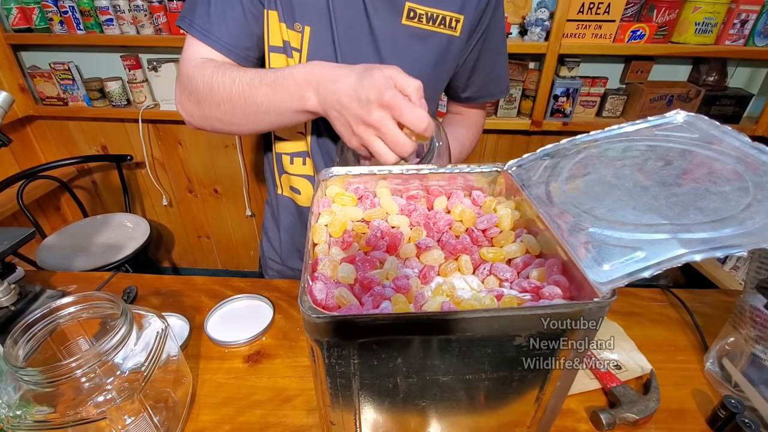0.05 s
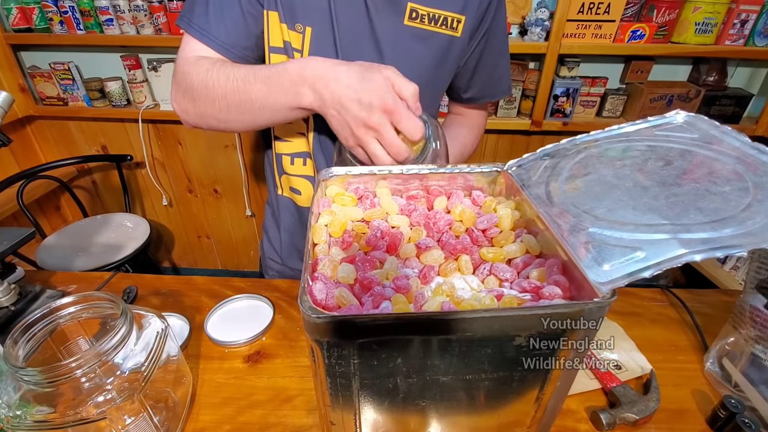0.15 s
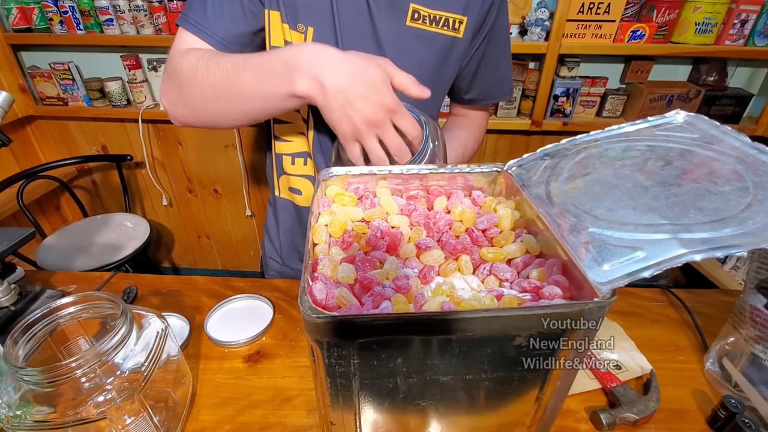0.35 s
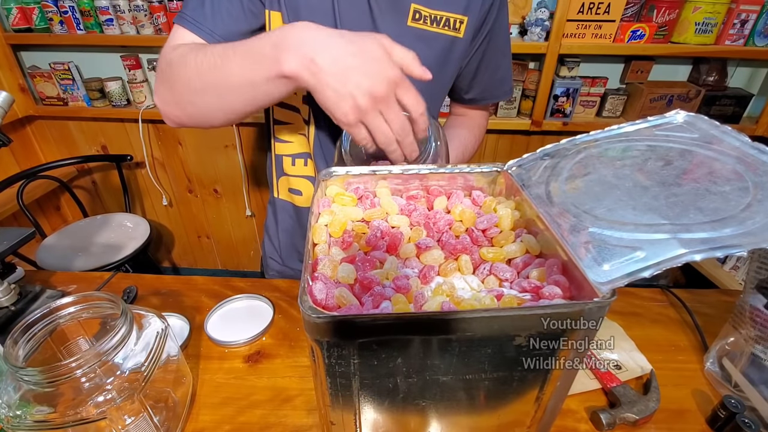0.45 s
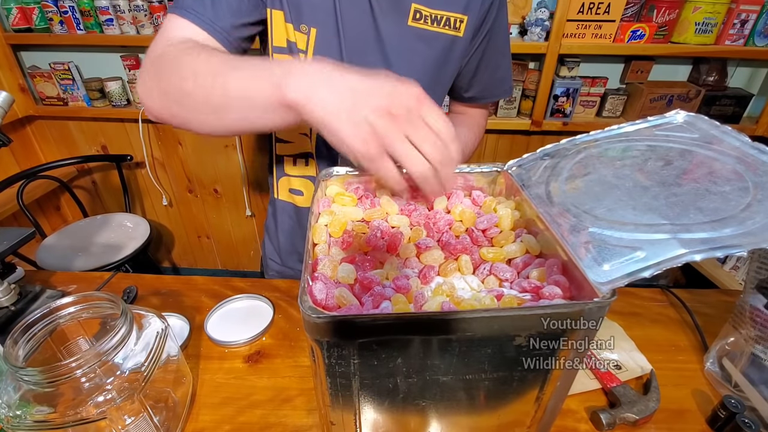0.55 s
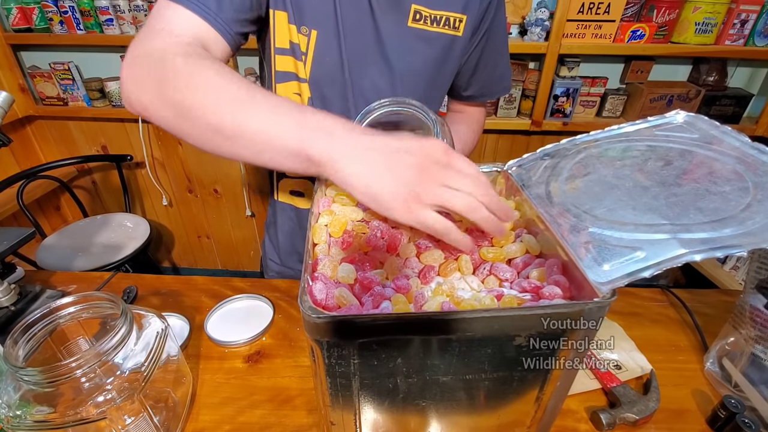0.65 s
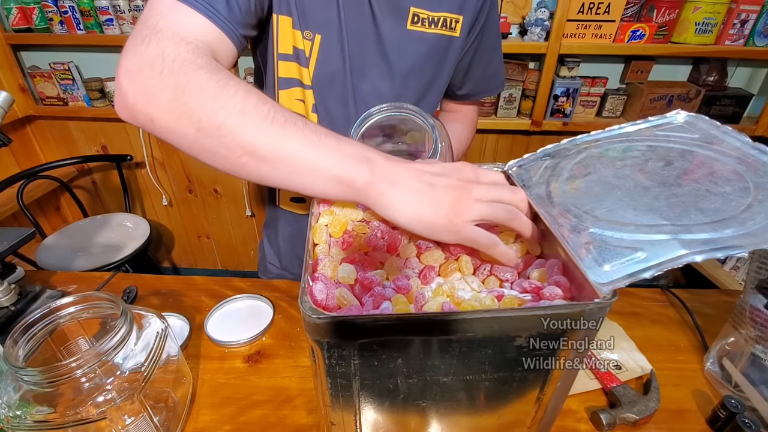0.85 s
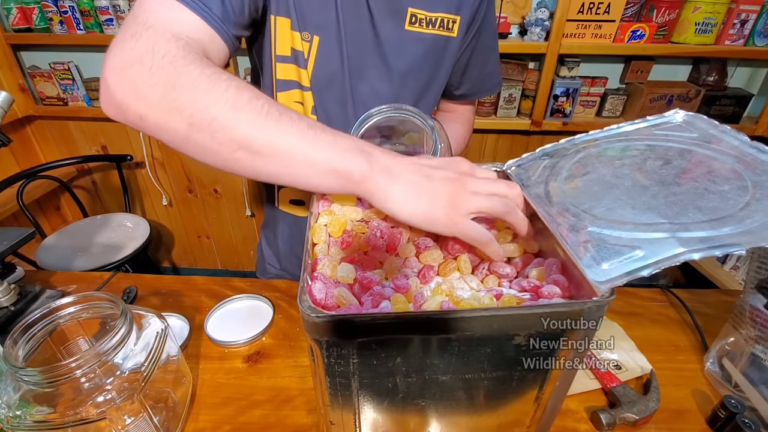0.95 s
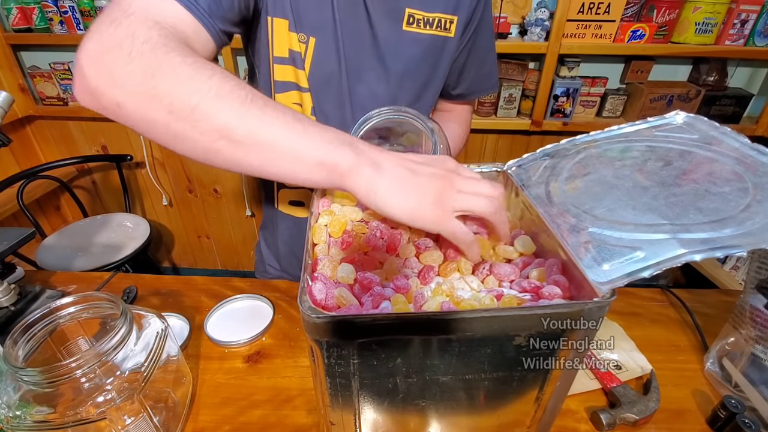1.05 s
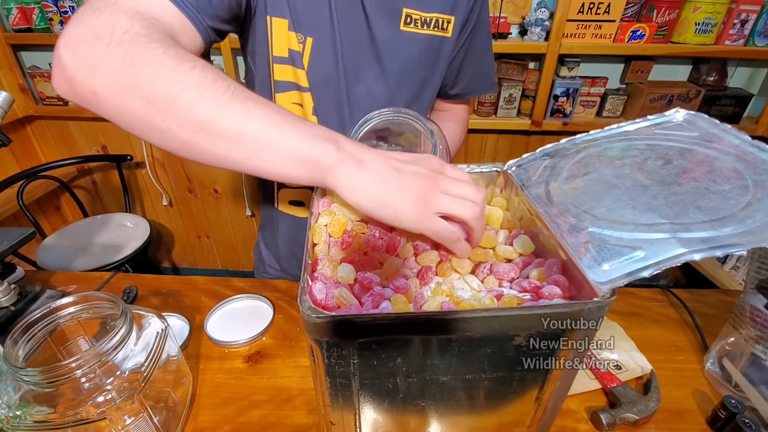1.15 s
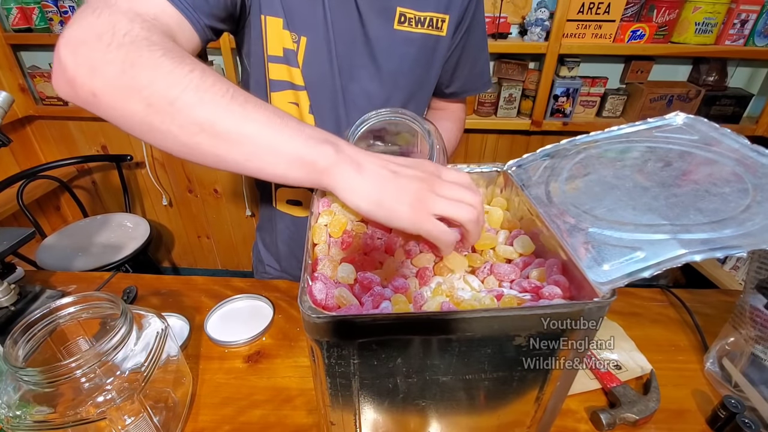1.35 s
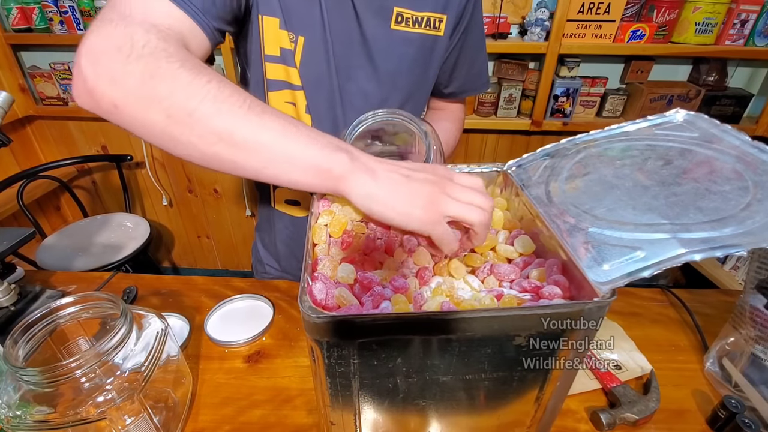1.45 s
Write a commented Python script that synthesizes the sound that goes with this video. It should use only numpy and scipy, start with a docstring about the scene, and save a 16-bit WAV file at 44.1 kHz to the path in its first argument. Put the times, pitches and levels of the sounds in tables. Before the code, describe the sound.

Hard candies tick lightly on a glass jar, then at 0.2 seconds tumble in with a quick clatter, the glass ringing over a soft hollow hum. A few stragglers clink until 0.7 seconds. At about 0.8 seconds a hand lands dully in a big metal tin and digs through sweets, which crunch and knock until 1.5 seconds. It is all close, in a small room.

```python
"""Over a faint low rumble, hard candy ticks lightly three times on a hand-held glass jar.
The candies tumble in with a quick clatter: the glass rings and the air inside hums. A few stragglers follow.
Then the hand lands in a big metal tin and digs through the sweets, which crunch and knock dully
against each other and the tin's walls. It is all heard close up, in stereo, in a small wood-lined room."""
import sys
import numpy as np
from scipy import signal
from scipy.fft import rfft, irfft, next_fast_len
from scipy.io import wavfile
from scipy.ndimage import map_coordinates

SR = 44100
rng = np.random.default_rng(int(sys.argv[2]) if len(sys.argv) > 2 else 0)


def bounce(signal):
    """Save signal as a 16-bit WAV file at the path given by the first command-line argument."""
    frames = np.transpose(np.atleast_2d(signal))
    limited = np.clip(frames, -1, 1)
    pcm = np.round(limited * 32767).astype(np.int16)
    wavfile.write(sys.argv[1], SR, pcm)


N = 66150  # 1.5 seconds
ATTACK_S = 0.00081  # how quickly a hit rises

# Stereo width of all but the clinks. Each row: frequency in Hz, how alike left and right are (1 = same).
LIKENESS = [(100, .98), (500, 1), (1000, 0.9), (2500, 0.57), (9000, 0.18)]


def amp(db):
    """Turn decibels into a gain."""
    return 10 ** (np.asarray(db) / 20)


def unit(x):
    """Scale a sound to an average (rms) level of 1."""
    return x / np.sqrt(np.mean(x ** 2) + 1e-20)


def along(points, hz):
    """Read between rows of frequency and value, on a pitch scale."""
    freqs, values = np.transpose(points)
    return np.interp(np.log(hz + 1), np.log(freqs + 1), values)


def filtered(x, response):
    """Multiply each frequency in x by the gain that response gives for it."""
    n = x.shape[-1]
    padded = next_fast_len(n + 8192)
    return irfft(rfft(x, padded) * response(np.fft.rfftfreq(padded, 1 / SR)), padded)[..., :n]


def stereo(pair, colour, likeness=LIKENESS, tilt_db=0):
    """Give two unrelated noises a tone colour and blend them into a partly alike left and right."""
    def response(hz):
        turn = np.arccos(np.clip(along(likeness, hz), -1, 1)) / 2
        octaves = np.log2(np.maximum(hz, 150) / 1000)
        return amp(along(colour, hz) + tilt_db * octaves) * [np.cos(turn), np.sin(turn)]
    mid, side = filtered(pair, response)
    return unit(np.array([mid + side, mid - side]))


def fade(t, t60):
    """Die away by 60 dB in t60 seconds, the fade time."""
    return amp(-60 * t / np.maximum(t60, 1e-3))


def rise(t, seconds=ATTACK_S):
    """Swell from silence towards full level."""
    return 1 - np.exp(-t / seconds)


def dying(x, fade_times):
    """Let each frequency of x die away at its own speed."""
    hz, t, spectrum = signal.stft(x, SR, nperseg=256)
    spectrum = spectrum * fade(t, along(fade_times, hz)[:, None])
    return signal.istft(spectrum, SR, nperseg=256)[1][:, :x.shape[1]]


def pan(db):
    """Two gains that make the left louder than the right by db."""
    return amp(np.array([[db], [-db]]) / 2)


def add(out, start, x):
    """Mix x into out, from start seconds on."""
    i = round(start * SR)
    out[:, i:i + x.shape[1]] += x[:, :N - i]


def noise(length):
    """Two unrelated white noises."""
    return rng.standard_normal((2, length))


def grains(per_second, spread_db=3):
    """Two streams of tiny random clicks."""
    hits = rng.random((2, N)) < per_second / SR
    return hits * np.sign(noise(N)) * amp(spread_db * noise(N))


def hush():
    """The faint, steady background noise of the room."""
    # Each row: frequency in Hz, level in dB.
    colour = [(20, -22), (35, -11.5), (52, 2), (90, -11.5), (300, -11.5), (700, -19), (1500, -17),
              (3500, -27.5), (6000, -24.5), (16000, -34)]
    return amp(-79) * stereo(noise(N), colour)


def room_echo(x, delay_s=0.008, level_db=-11.5):
    """The wooden walls send the sound back as a short tail."""
    # Each row: frequency in Hz, fade time in seconds.
    fade_times = [(150, 0.16), (2000, 0.28), (5000, 0.19), (14000, 0.24)]
    t = np.arange(SR // 2) / SR
    tail = dying(noise(len(t)), fade_times) * (t > delay_s)
    return amp(level_db) * signal.fftconvolve(x, tail / np.linalg.norm(tail[0]), axes=1)[:, :N]


def faint_rumble(fade_from_s=0.62):
    """A faint low rumble and soft rustle, dying away after the tumble."""
    # Each row: frequency in Hz, level in dB.
    colour = [(25, -11.5), (55, 19.5), (90, 4), (160, -7), (260, 5), (600, -4), (1100, -6.5), (2500, -7.5),
              (6000, -25.5), (16000, -27.5)]
    time_fading = np.maximum(np.arange(N) / SR - fade_from_s, 0)
    return amp(-64) * stereo(grains(per_second=5000), colour) * fade(time_fading, t60=0.48)


def jar_hollow(hum_hz=236.7):
    """The heap shifts with a soft thud, and the air in the jar hums a low note."""
    # The heap's shifts. Each row: start in seconds, level in dB.
    shifts = [(0.091, -59), (0.128, -49), (0.213, -37.5), (0.318, -34.5), (0.337, -37.5), (0.414, -36)]
    # Each row: frequency in Hz, level in dB.
    thud_colour = [(30, -24), (70, -12.5), (170, -20.5), (240, -3.5), (330, -18), (480, -1), (800, -15.5),
                   (1100, 1.5), (1500, -24), (5000, -55.5)]
    out, t = np.zeros((2, N)), np.arange(SR // 2) / SR
    for start, db in shifts:
        hum = np.sin(2 * np.pi * hum_hz * (t + start)) * rise(t, 0.006) * fade(t, t60=0.19)
        thud = stereo(noise(len(t)), thud_colour) * rise(t) * fade(t, t60=0.48)
        add(out, start, amp(db) * (hum + amp(-3.5) / 2 * thud))
    return out


def waver(count, length, radians=0.4, changes_per_s=120):
    """Candies touching the glass disturb its ring: each tone's phase drifts smoothly at random."""
    position = np.arange(length) * changes_per_s / SR
    drifts = rng.standard_normal((count, 128))
    return radians * np.array([map_coordinates(row, [position], mode='mirror') for row in drifts])


def glass_ring(t, tones, focus_hz, focus_octaves=0.2):
    """The glass rings at its own tones; the spot that is struck favours those near focus_hz."""
    hz, db, t60 = np.transpose(tones)[:, :, None]
    boost_db = 11.5 * np.exp(-(np.log2(hz / focus_hz) / focus_octaves) ** 2)
    scatter_db = 1.5 * rng.standard_normal(hz.shape)
    gains = amp(db + boost_db + scatter_db)
    phase = 2 * np.pi * rng.random(hz.shape)
    phase = phase + 0.59 * rng.standard_normal((2, len(hz), 1))  # left and right are a little apart
    waves = np.sin(2 * np.pi * hz * t + phase + waver(len(hz), len(t)))
    return (gains * fade(t, t60) * waves).sum(axis=1) * np.sqrt(2) / np.linalg.norm(gains)


def candy_ping(t, colour, centre_hz=6054, spread_octaves=0.65):
    """A struck candy rings briefly at high pitches of its own."""
    hz = centre_hz * 2 ** (spread_octaves * rng.standard_normal((14, 1)))
    gains = amp(along(colour, hz)) * (hz < 16000)
    phase = 2 * np.pi * rng.random((2, len(hz), 1))
    waves = gains * np.sin(2 * np.pi * hz * t + phase)
    return unit(waves.sum(axis=1)) * fade(t, t60=0.05)


def clinks(hits, colour, tones):
    """Each hit on the jar is a crack, a short clatter, the ring of the glass and the candy's ping."""
    # The clatter's stereo width. Each row: frequency in Hz, how alike left and right are (1 = same).
    likeness = [(250, 0.88), (1000, 0.67), (2500, 0.2), (5000, 0.1), (12000, 0.096)]
    # How the clatter dies. Each row: frequency in Hz, fade time in seconds.
    fade_times = [(300, 0.26), (2200, .115), (5000, 0.12), (12000, 0.11)]
    out, t = np.zeros((2, N)), np.arange(SR // 3) / SR
    for start, db, tilt_db, ring_db, pan_db, focus_hz in hits:
        clatter = dying(stereo(noise(len(t)), colour, likeness, tilt_db), fade_times)
        clatter *= 1 + amp(-8.5) * fade(t, t60=0.0038)  # the crack at the very start
        ring = amp(ring_db) * glass_ring(t, tones, focus_hz)
        ping = amp(-12 + tilt_db) * candy_ping(t, colour)  # brighter hits ping louder
        add(out, start, amp(db) * pan(pan_db) * (clatter + ring + ping) * rise(t))
    return out


def first_ticks():
    """Candy taps lightly on the glass before the tumble."""
    # Each row: start in seconds, level in dB, brightness in dB per octave, ring level in dB,
    # left over right in dB, favoured ring pitch in Hz.
    ticks = [(0.0425, -38.5, 0, 6, 2, 4180), (0.096, -51, 5, 4.5, 2, 4450),
             (0.1255, -34, 5.5, -4.5, 2.5, 7300)]
    # Each row: frequency in Hz, level in dB.
    colour = [(200, -17), (800, -11), (1100, -28), (1400, 2.5), (1950, 4), (2900, -5.5), (3900, 4.5),
              (4700, -13), (6400, -4.5), (7400, -40), (8900, -5), (10400, -35), (12200, -13.5),
              (16000, -31.5)]
    # The lightly tapped glass. Each row: pitch in Hz, level in dB, fade time in seconds.
    tones = [(1097, 1.5, 0.055), (3670, -0.5, 0.08), (3958, -6.5, 0.24), (4420, -10, 0.17),
             (4410, -5.5, .12), (4540, -6.5, 0.13), (4925, -7, 0.22), (5823, -4, 0.126), (9100, -30, 0.17)]
    return clinks(ticks, colour, tones)


def tumble():
    """The candies fall into the jar in a rush, with a few stragglers after them."""
    # Each row: start in seconds, level in dB, brightness in dB per octave, ring level in dB,
    # left over right in dB, favoured ring pitch in Hz.
    drops = [(0.2096, -37, 5, -4.5, 2.5, 4280), (0.2180, -34.5, -5, -8, 2, 2766),
             (0.2320, -34.5, -1, -9, -11.5, 2400), (0.2432, -30, 11.5, 4, 5, 3900),
             (0.2530, -29, -4, 2.5, 0.5, 3560), (0.2680, -34.5, 21.5, 7.5, 9, 2850),
             (0.2908, -28, 5, 4, 5, 3860), (0.3170, -26, 12.5, -3.5, 3, 9200),
             (0.3290, -29, -4.5, -13, 1.5, 2800), (0.3368, -31.5, -3, -1.5, 2.5, 5360),
             (0.3550, -20, 10, -3.5, 4, 5700), (0.3638, -27.5, 0, 2.5, -0.5, 3370),
             (0.3924, -13, 1, -6, 3.5, 1930), (0.4036, -25.5, 0, -9, 5.5, 2270),
             (0.4158, -29, 6, -0.5, -1, 3290), (0.4404, -17, 4.5, 4.5, 4.5, 3560),
             (0.4470, -20, 2, 2, 2, 2640), (0.4560, -29, -3, 4, 2.5, 2590),
             (0.5400, -40, -4, -22, 1.5, 2400), (0.5750, -44.5, -3, -15, 2.5, 2305),
             (0.6158, -38.5, 0, -4.5, 2, 2310), (0.6512, -29.5, 1, -5.5, 3.5, 2220),
             (0.7005, -40.5, 0.5, -39, 1.5, 2120)]
    # The clatter of candies and glass. Each row: frequency in Hz, level in dB.
    colour = [(120, -34), (250, -18), (800, -21.5), (1100, -18.5), (1300, -18.5), (1950, 2.5), (2650, 2.5),
              (3000, -7), (3400, 2), (4300, -6.5), (5600, -9), (6350, -5.5), (7200, -17), (9400, -18),
              (10500, -23), (16000, -31)]
    # The glass jar. Each row: pitch in Hz, level in dB, fade time in seconds.
    tones = [(1996, -3, 0.11), (2142, -10, 0.22), (2442, -1.5, 0.091), (2740, -18, 0.07), (2740, -5, 0.11),
             (3306, -1.5, 0.15), (3462, -8.5, 0.13), (3824, -1, 0.12), (4137, -4, 0.097), (4260, -8.5, .11),
             (4848, -3.5, 0.14), (5285, -4, 0.08), (5355, -7.5, 0.054), (6120, -9, 0.098),
             (6540, -22, 0.051), (7480, -15.5, .1), (9040, -19, .07), (9550, -15, 0.11)]
    return clinks(drops, colour, tones)


def hand_landing(hollow_hz=153.6):
    """The hand lands on the heap with a dull puff, and the tin's hollow booms."""
    # Each row: start in seconds, level in dB.
    landings = [(0.8307, -39.5), (0.8382, -37)]
    # The puff. Each row: frequency in Hz, level in dB.
    colour = [(30, -6), (60, 6), (200, -6), (420, 3), (800, -29), (1100, -35), (2200, -24), (5000, -40),
              (16000, -50)]
    out, t = np.zeros((2, N)), np.arange(SR // 6) / SR
    boom = amp(-6) * np.sin(2 * np.pi * hollow_hz * t)
    for start, db in landings:
        puff = stereo(noise(len(t)), colour)
        add(out, start, amp(db) * (puff + boom) * rise(t) * fade(t, t60=0.11))
    return out


def sweet_knocks():
    """Single sweets knock in the tin, each with a dull crack and a very short note."""
    # Each row: start in seconds, level in dB, brightness in dB per octave, pitch in Hz.
    knocks = [(0.8625, -35, 0.5, 900), (0.877, -44.5, 10, 890), (0.9, -35, -5, 1020),
              (0.944, -36, -6.5, 1020), (0.9685, -34.5, -0.5, 1030), (0.9835, -32, 4, 915),
              (1.036, -39, 8, 596), (1.054, -36.5, 8.5, 860), (1.103, -25.5, -1, 1360),
              (1.113, -46.5, 4.5, 580), (1.124, -23, -6.5, 974), (1.140, -28.5, 2, 1090),
              (1.175, -26, 5, 710), (1.196, -32, 6.5, 1570), (1.233, -30, 4, 950), (1.308, -35, -6, 770),
              (1.354, -28.5, 1, 650), (1.423, -32, 3, 1880), (1.460, -33, 2, 420)]
    # The crack. Each row: frequency in Hz, level in dB.
    colour = [(20, -47), (60, -11), (150, -7), (500, -1.5), (950, -3), (1400, -4), (2200, -11), (5000, -23),
              (16000, -44)]
    out, t = np.zeros((2, N)), np.arange(SR // 6) / SR
    for start, db, tilt_db, hz in knocks:
        crack = stereo(noise(len(t)), colour, tilt_db=tilt_db)
        note = amp(0.5) * np.sin(2 * np.pi * hz * t)
        add(out, start, amp(db) * (crack + note) * rise(t) * fade(t, t60=0.021))
    return out


def tin_walls(shaking):
    """The metal walls ring at their own pitches when the sweets shake them."""
    # Each row: pitch in Hz, width of the peak in Hz, level in dB.
    peaks = [(156, 29, 5), (250, 58, -45), (358, 44, -8.5), (520.4, 27, 9.5), (738, 33, -0.5),
             (886, 25.5, 9.5), (1048, 65, 0), (1740, 110, -3), (1920, 31, -36)]

    def response(hz):  # neighbouring peaks swing in opposite directions
        return sum((-1) ** k * amp(db) * 1j * hz * width / (pitch ** 2 - hz ** 2 + 1j * hz * width)
                   for k, (pitch, width, db) in enumerate(peaks))
    return unit(filtered(shaking, response))


def dig_in_tin(start_s=0.832, left_lag_s=0.0001):
    """Buried sweets crunch and knock, their sugar coats grate, and the tin's walls and hollow answer."""
    # How hard the hand digs. Each row: time in seconds, strength of the push in dB, of the grating in dB.
    digging = [(0.83, -49, -62), (0.86, -49, -62), (0.903, -39.5, -48), (0.934, -54.5, -57),
               (0.958, -49, -74), (0.987, -38, -47), (1.024, -49, -53.5), (1.049, -40, -46.5),
               (1.108, -31, -37.5), (1.141, -35, -35.5), (1.151, -40, -42), (1.22, -35, -42),
               (1.279, -38, -46), (1.335, -46.5, -63.5), (1.396, -42.5, -56.5), (1.421, -40.5, -37),
               (1.438, -40.5, -48), (1.5, -39.5, -58.5)]
    # Sweets crunching. Each row: frequency in Hz, level in dB.
    crunch_colour = [(20, -45), (40, -16), (60, -14), (110, -19), (200, -4.5), (260, 2), (500, -0.5),
                     (1000, 0.5), (1300, -6.5), (1800, 1.5), (2600, -14.5), (6000, -17), (16000, -63.5)]
    # Sugar coats grating. Each row: frequency in Hz, level in dB.
    grit_colour = [(300, -11.5), (1200, -1.5), (2000, -2), (3200, -4), (5000, -13.5), (7300, -25),
                   (9200, -15.5), (12000, -30.5), (16000, -23)]
    # The tin's hollow and the counter under it. Each row: frequency in Hz, level in dB.
    boom_colour = [(20, -45), (36, -18), (58, -4.5), (85, -8.5), (125, -12.5), (156, 9), (185, -10.5),
                   (220, -9), (500, -32)]
    t = np.arange(N) / SR
    times, push_db, grate_db = np.transpose(digging)
    touching = np.clip((t - start_s) / ATTACK_S, 0, 1)
    push = touching * amp(np.interp(t, times, push_db))
    grate = touching * amp(np.interp(t, times, grate_db))
    crunch = push * stereo(grains(per_second=1000), crunch_colour)
    grit = grate * stereo(grains(per_second=5000), grit_colour)
    boom = push * stereo(noise(N), boom_colour)
    bumps = hand_landing() + sweet_knocks()
    walls = crunch.std() * tin_walls(crunch + bumps)
    whole = amp(-3) * crunch + amp(3) * grit + amp(-9) * boom + bumps + amp(-2.5) * walls
    delays = np.array([[left_lag_s], [-left_lag_s]]) / 2
    return pan(1.5) * filtered(whole, lambda hz: np.exp(-2j * np.pi * hz * delays))


def scene():
    """First the jar, then the tin, with the room's echo and faint hush."""
    direct = first_ticks() + tumble() + jar_hollow() + faint_rumble() + dig_in_tin()
    return direct + room_echo(direct) + hush()


def record(dry, low_cut_hz=45, top_hz=16000):
    """The microphone loses the deepest bass and the very highest treble."""
    low_cut = signal.butter(4, low_cut_hz, 'high', fs=SR, output='sos')
    return filtered(signal.sosfilt(low_cut, dry), lambda hz: hz < top_hz)


dry = scene()
out = record(dry)
bounce(out)
```